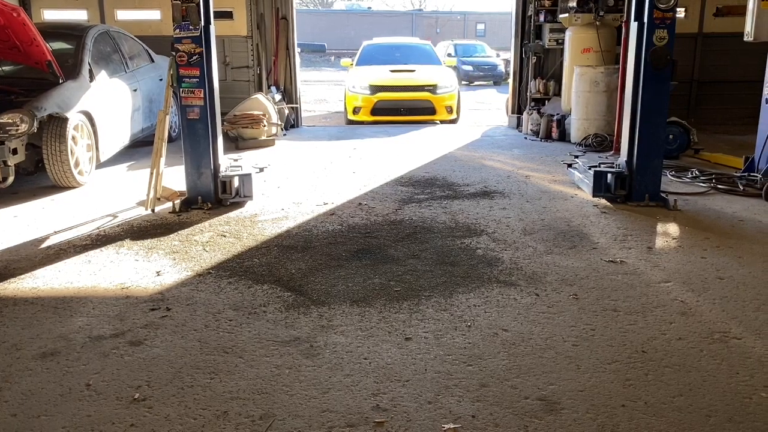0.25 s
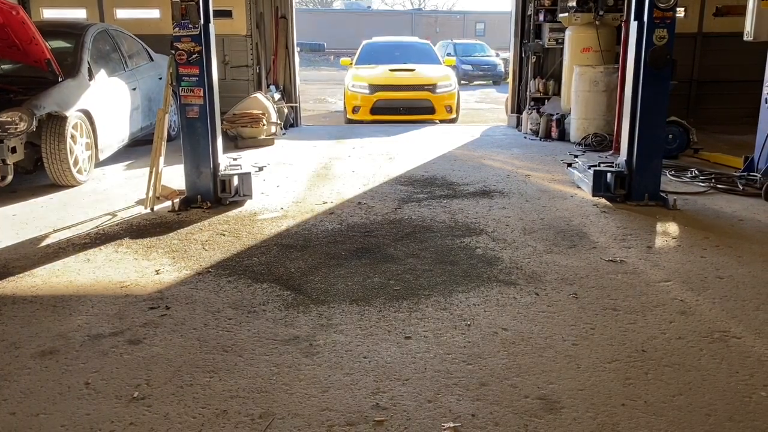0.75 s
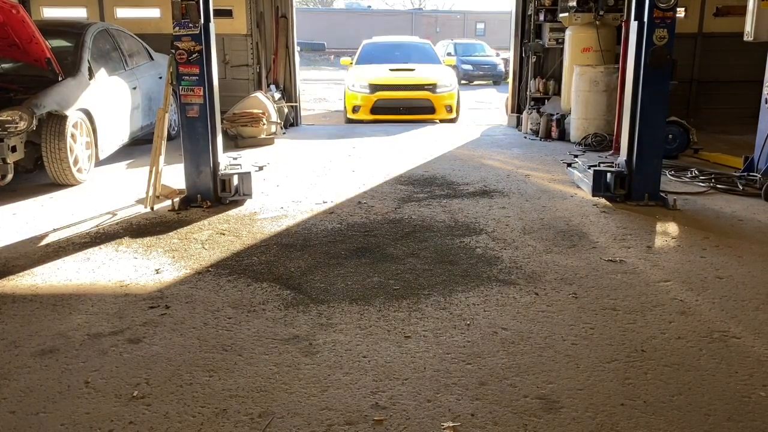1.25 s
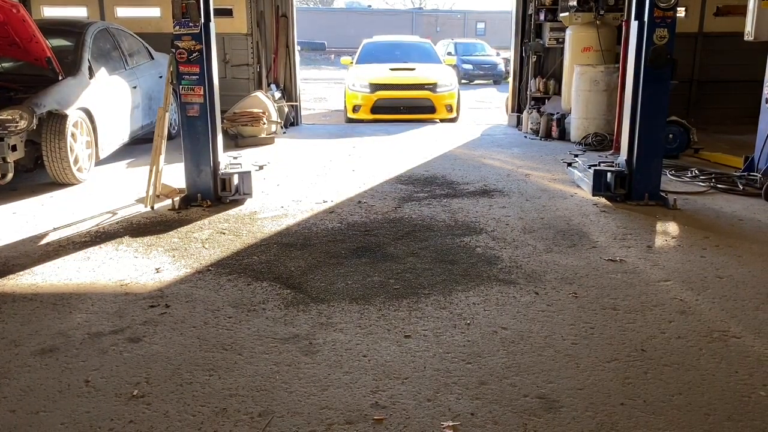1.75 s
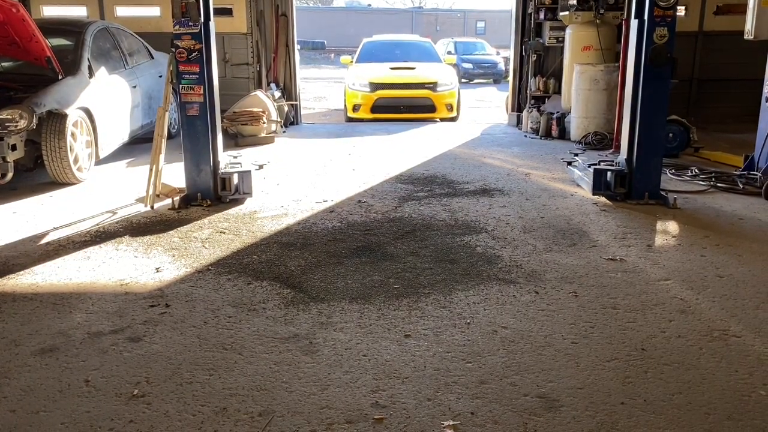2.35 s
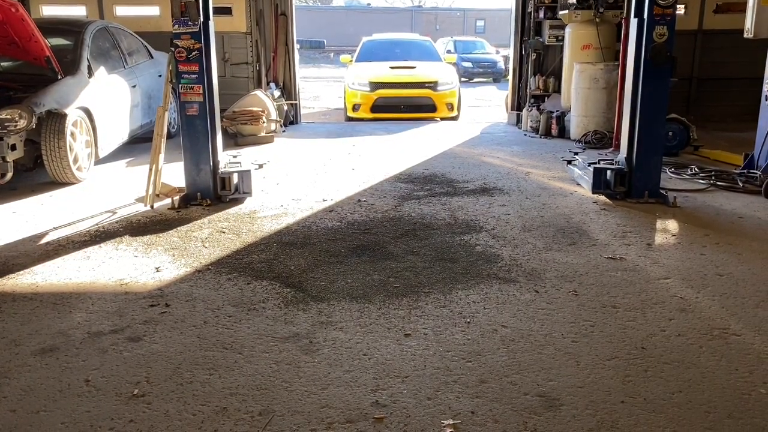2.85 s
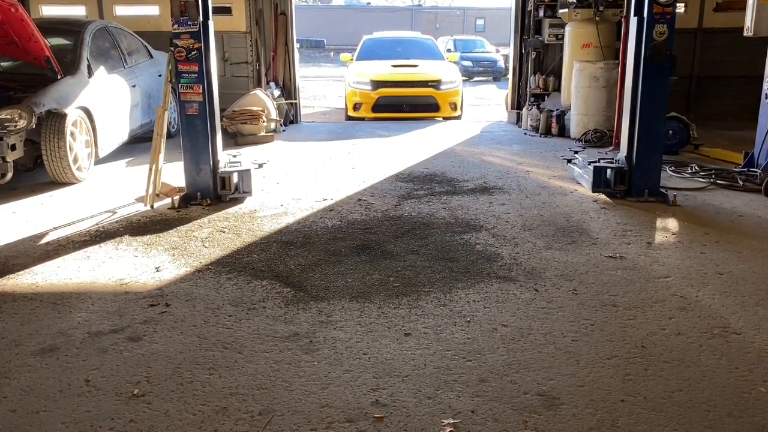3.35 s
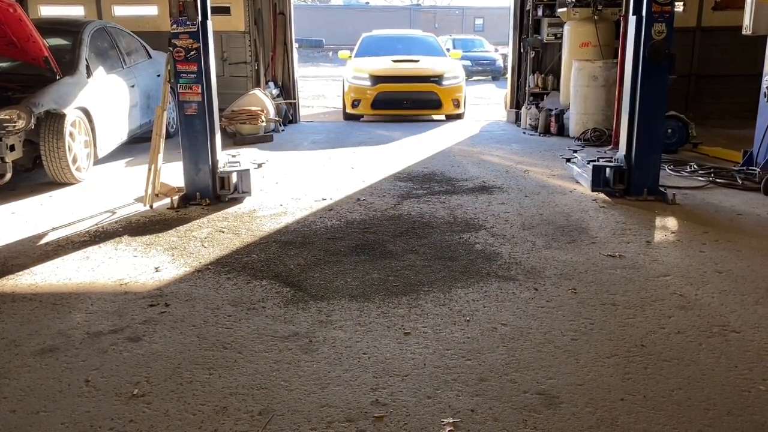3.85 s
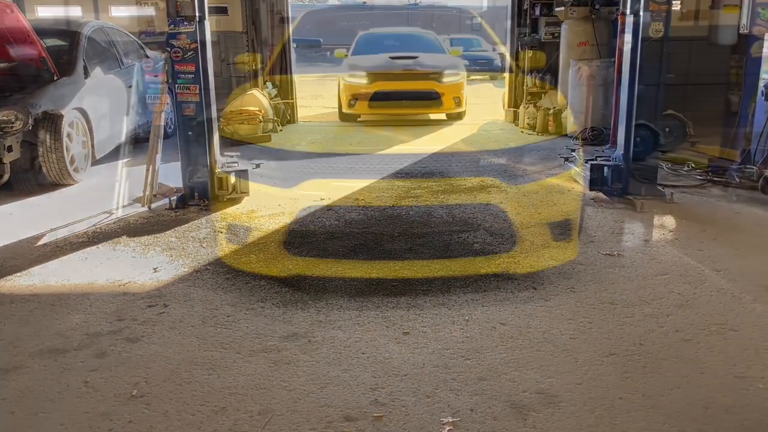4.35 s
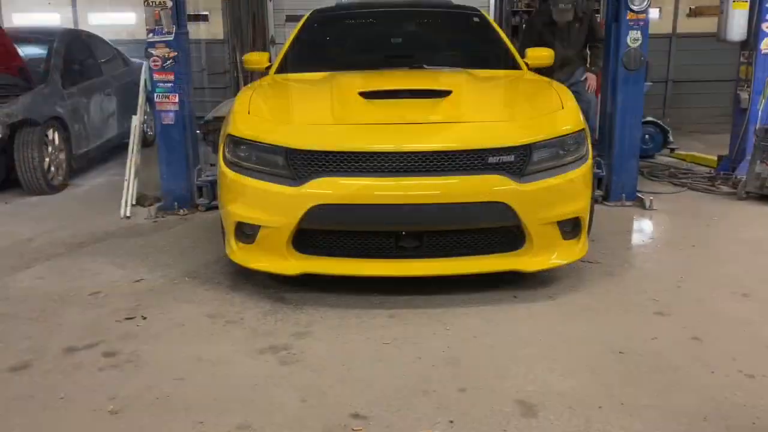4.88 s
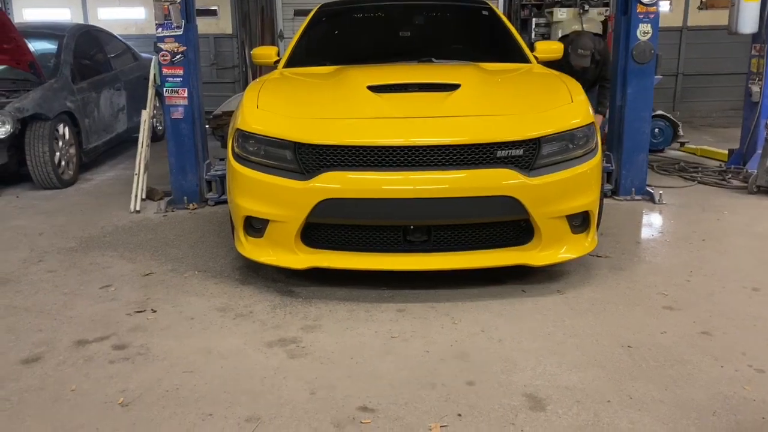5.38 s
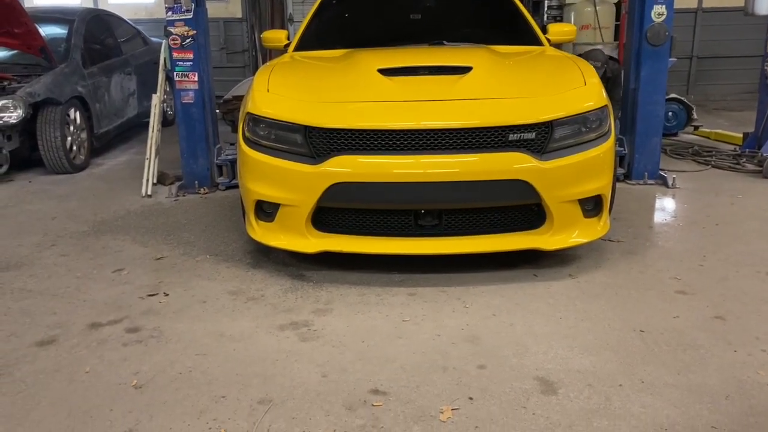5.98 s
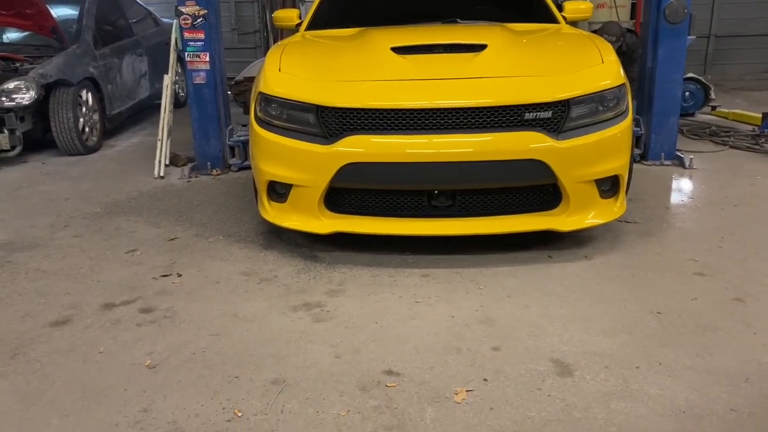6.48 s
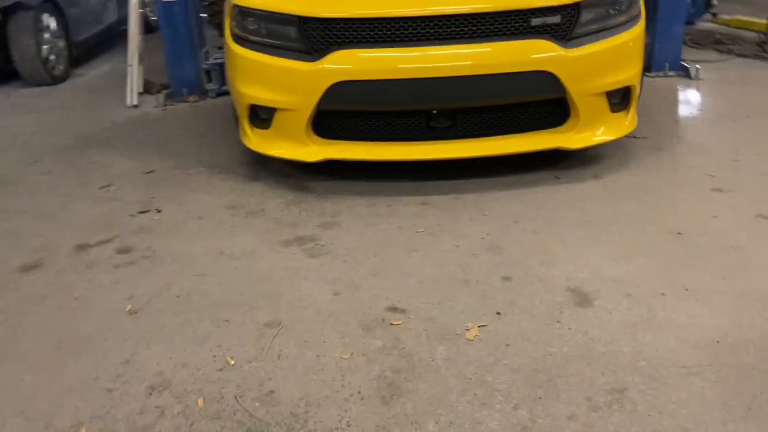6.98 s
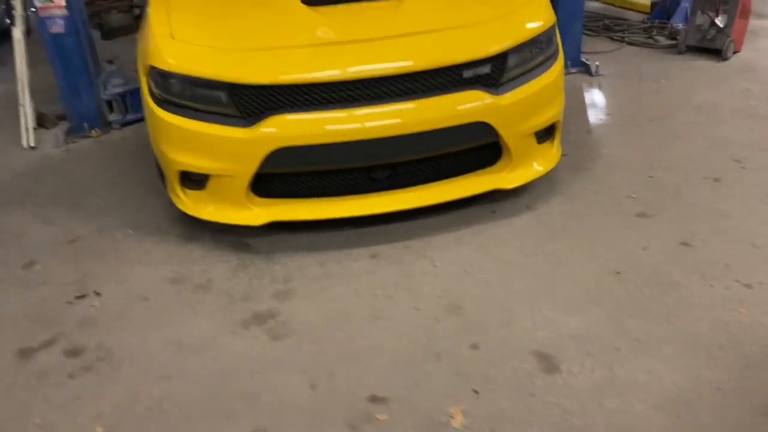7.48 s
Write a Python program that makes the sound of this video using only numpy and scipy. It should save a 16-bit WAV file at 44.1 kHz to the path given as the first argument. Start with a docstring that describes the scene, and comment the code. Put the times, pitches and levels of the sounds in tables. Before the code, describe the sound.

In a hard-walled workshop, a forced-air heater roars steadily with fluttering low booms, airy hiss and motor buzz. A V8 idles faintly low at the door. The sound cuts to complete silence for under a second, returns abruptly, and the engine blips. Then the engine fades out while a soft belt-and-fan whirr comes close. Near the end metal scrapes harshly, then a shoe drags and scuffs concrete. Wide stereo microphones shift position late.

```python
"""A workshop filled by the roar of a forced-air heater: random flame puffs ring the modes of its tube and the hall,
filtered noise makes the rush and hiss, and shaft harmonics make the motor buzz. From the start a V8 idles at the
door, heard as a firing tone and its octave; the sound drops out from about 1.1 to 2.0 s, and near 3 s the engine blips.
From 4 to 5 s the steady levels cross over: the engine tone fades away and a whirr of belts and fan stands close by.
After 6.9 s metal scrapes, then a shoe drags and scuffs: noisy rubbing, single resonant slips and dry ticks."""
import sys
import numpy as np
from scipy import signal
from scipy.fft import rfft, irfft, next_fast_len
from scipy.io import wavfile
from scipy.ndimage import uniform_filter1d

SR = 44100
rng = np.random.default_rng(int(sys.argv[2]) if len(sys.argv) > 2 else 0)


def dump_mix(stems):
    """Bounce the given channels to the path in sys.argv[1] as a 16-bit WAV at rate SR."""
    frames = np.atleast_2d(stems).T  # one column per channel
    limited = np.clip(frames, -1, 1)  # hard clip at full scale
    pcm = np.round(limited * 32767).astype(np.int16)
    wavfile.write(sys.argv[1], SR, pcm)


N = 340893
T = np.arange(N) / SR
SIZE = next_fast_len(N + SR)  # transform length, with room for ringing
HZ = np.fft.rfftfreq(SIZE, 1 / SR)


def gain_of(db):
    """Level law: decibels to an amplitude factor."""
    return 10 ** (np.asarray(db) / 20)


def balance(lean_db):
    """Stereo balance: left and right gains whose levels differ by lean_db."""
    return gain_of(np.array([[lean_db], [-lean_db]]) / 2)


def evened(x):
    """Normalization to unit rms."""
    return x / np.sqrt(np.mean(x ** 2) + 1e-20)


def ramp(start_s, end_s):
    """Linear transition from 0 to 1 between two times."""
    return np.clip((T - start_s) / (end_s - start_s), 0, 1)


def curve(rows, column=1):
    """Linear interpolation: one column of a time table at every sample."""
    rows = np.array(rows)
    return np.interp(T, rows[:, 0], rows[:, column])


def crossfaded(levels_db):
    """Power addition: gain of a steady source as its earlier level gives way to its later one."""
    later = ramp(3.98, 4.98)
    power = 1.12  # 1 = straight ramps, whose unrelated sounds sag in the middle
    before, after = gain_of(levels_db)
    return np.hypot(before * (1 - later) ** power, after * later ** power)


def flicker(rate_hz):
    """Low-passed noise: a slow random wobble of unit rms."""
    return evened(signal.lfilter(*signal.butter(2, rate_hz, fs=SR), rng.standard_normal(N)))


def puffs(per_s, spread_db):
    """Random impulse process: two unrelated trains of puffs, a few of them large."""
    size = gain_of(spread_db * np.minimum(rng.exponential(1, (2, N)), 4))
    occurs = rng.random((2, N)) < per_s / SR
    return size * occurs * rng.choice([-1., 1.], (2, N))


def peak(hz, width):
    """Resonance: squared Lorentzian power shape, its full width taken at a quarter of the peak power."""
    return 1 / (1 + (2 * (HZ - hz) / width) ** 2) ** 2


def modes(table):
    """Modal superposition of power: left and right magnitude, each mode with its own balance."""
    power = 0
    for hz, width, db, lean_db in table:
        # doubled decibels give power; half the lean goes to each side
        power = power + gain_of(2 * db) * balance(2 * lean_db) * peak(hz, width)
    return np.sqrt(power)


def ringing(body):
    """Modal superposition of power: magnitude of the resonances of one body."""
    return np.sqrt(sum(gain_of(2 * db) * peak(hz, width) for hz, width, db in body))


def causal(magnitude):
    """Minimum phase by cepstral folding: a ring follows its blow, with the same phase on both sides."""
    folded = irfft(np.log(np.atleast_2d(magnitude).mean(0) + 1e-9), SIZE)
    folded[1:SIZE // 2] *= 2
    folded[SIZE // 2 + 1:] = 0
    return magnitude * np.exp(1j * rfft(folded).imag)


def pair(drive, magnitude, lead_share=1):
    """Partial coherence: a coloured drive reaches left and right as a phase-shifted shared part and an unrelated one."""
    # phase by which the left side leads the right: frequency_hz, lead_rad
    lead_table = [(0, 0), (330, .9), (500, 1), (900, 2.3), (2000, 5.2), (3400, 9.1), (3700, 11),
                  (6200, 18.8), (6600, 19), (8300, 15.8), (8800, 15.5), (9700, 12.6), (10400, 12.5),
                  (11700, 9.45), (12400, 9.4), (13600, 6.4), (14400, 6.1), (15200, 4.1), (15800, 3.1)]
    # likeness of left and right sound by frequency: frequency_hz, likeness (0-1)
    likeness_table = [(100, 1), (150, .88), (250, .93), (380, .5), (440, .8), (550, .4), (700, .65),
                      (1100, .76), (2500, .7), (3500, .45), (6500, .3), (7900, .38), (8400, .85),
                      (9300, .62), (9800, 1), (10300, 1), (11400, .65), (11750, 1), (12350, 1),
                      (12700, .65), (13700, 1), (14300, 1), (15000, .8), (15700, .98)]
    first, other = rfft(drive, SIZE)
    alike = np.clip(np.interp(HZ, *np.transpose(likeness_table)), 0, 1)
    lead = lead_share * np.interp(HZ, *np.transpose(lead_table))
    shared = first * np.exp(-1j * lead)
    both = np.array([first, alike * shared + np.sqrt(1 - alike ** 2) * other])
    return evened(irfft(both * magnitude, SIZE)[:, :N])


def rub(stroke, body, per_s, lead_share):
    """Source and filter: dense random impulses under a gain, coloured by the resonances of a body."""
    return pair(puffs(per_s, spread_db=1.5), ringing(body), lead_share) * stroke


def strokes(rows, sag_db=6):
    """Amplitude envelope of friction: each stroke rises, sags while held, and falls."""
    range_db = 18  # depth of rise and fall
    out = np.zeros(N)
    for start, rise, hold, fall, db in rows:
        at = np.cumsum([start, rise, hold, fall])
        shape_db = np.interp(T, at, [-range_db, 0, -sag_db, -range_db])
        out += gain_of(db + shape_db) * (T > at[0]) * (T < at[-1])
    return uniform_filter1d(out, size=200)


def slips(rows):
    """Stick-slip excitation: each slip is a knock, a quick puff of grit and a tail carried on by the hall."""
    rise_s, t60_s, crest_db = .0015, .016, 1
    click, grit_share = 3.5, .75  # amplitude factors
    tail_db, tail_t60_s = -13, .16
    grit_power, knocks = np.zeros(N), np.zeros(N)
    for s, db, *_ in rows:
        since = np.maximum(T - s, 0)
        fade = grit_share ** 2 * gain_of(-120 * since / t60_s)  # 120 because this is power
        fade += gain_of(2 * tail_db - 120 * since / tail_t60_s)
        grit_power += gain_of(2 * (db - crest_db)) * fade * np.minimum(since / rise_s, 1)
        knocks[round((s + rise_s / 2) * SR)] = click * gain_of(db - crest_db)
    return rng.standard_normal((2, N)) * np.sqrt(grit_power) + knocks


def chatter(rows, body, lead_share, low_hz):
    """Impulsive modal excitation: single slips leave a body ringing, each favouring other modes."""
    treble_hz = 2700
    drive = slips(rows)
    rung = pair(drive, causal(ringing(body)), lead_share) * np.sqrt(np.mean(drive ** 2))
    treble_filter = signal.firwin(255, treble_hz, pass_zero=False, fs=SR)
    low_filter = signal.firwin(255, low_hz, fs=SR)
    treble = signal.oaconvolve(rung, treble_filter[None], "same")
    low = signal.oaconvolve(rung, low_filter[None], "same")
    treble_change = gain_of(curve(rows, column=2)) - 1
    low_change = gain_of(curve(rows, column=3)) - 1
    return rung + treble * treble_change + low * low_change


def boom_swells_db(column):
    """Gaussian level changes: brief random rises and dips in the level of the boom."""
    # rises and dips of the boom: time_s, tube_modes_db, deep_hall_modes_db (both over steady)
    swells = [(.03, 4, 2), (.22, 0, -0.5), (.38, 0, 4), (.89, -0.5, 3.5), (2.4, 0, 4.5), (2.641, 0.5, 4),
              (3.2, -1, 7), (3.6, 1, 9), (3.801, 2, 0), (4.06, 3, 3), (4.681, 3.5, 1.5), (4.98, -2, 4.5),
              (5.331, 1, 8), (6.07, 2, 1), (6.21, -3, 5), (6.7, 0.5, 2.5), (6.781, 1, 3.5), (7.02, 2, 4),
              (7.27, 1, 3), (7.57, 1.5, -2.5)]
    half_width_s = .035
    return sum(row[column] * np.exp(-.5 * ((T - row[0]) / half_width_s) ** 2) for row in swells)


def flame_boom():
    """Modal resonance: flame puffs ring the low modes of the heater tube and the hall."""
    # booming modes of tube and hall: frequency_hz, width_hz, level_db, left_minus_right_db
    boom_modes = [(64, 14, -7, 2), (73.1, 11, 2.5, -0.5), (91, 10, -7.5, 0.5), (102.6, 23.3, 3.5, 0),
                  (125.9, 14, -1.5, 3), (146.4, 15.2, -6.5, 6.5), (170.6, 17.3, -1.5, 3.5),
                  (183, 9.2, -2, -0.5), (205.2, 11.2, -8, 1.5), (222.3, 22.3, -5, 1.5), (234.2, 20, -6, 6),
                  (256.3, 14.7, -2, 3), (278.7, 18, -1, 1.5), (305.1, 24.6, -1, 1), (333.7, 12.6, -5.5, -5),
                  (359.4, 15, -4, 9.5)]
    # tube modes met once the microphones have swung aside: frequency_hz, width_hz, level_db, left_minus_right_db
    aside_modes = [(143, 27, -2, 1), (172, 30, -2, 4), (195, 29, -1.5, 1), (223, 27, -6, 2.5),
                   (241, 14, -3.5, 0), (283.3, 26, -1, 2), (317, 18, -7.5, 2), (345, 25, -7.5, -1),
                   (383, 24, -7, 3), (414, 20, -12, 3.5)]
    # hardest single puffs: boom_peak_s, size_db (over the weakest puff)
    pops = [(0.0257, 15), (0.2087, 19.5), (0.2715, 16), (0.3838, 16), (0.4843, 20), (0.6443, 18),
            (0.6963, 15.5), (0.758, 15), (0.8296, 14), (0.9267, 14), (0.9805, 17.5), (1.0972, 15.5),
            (2.0241, 16), (2.1384, 17.5), (2.191, 18.5), (2.3556, 18.5), (2.5341, 13), (2.6563, 18.5),
            (2.7228, 19), (2.8354, 11), (3.0298, 12), (3.071, 12), (3.1522, 16), (3.2387, 13),
            (3.334, 11.5), (3.373, 18), (3.6485, 14), (3.991, 19.5), (4.088, 17.5), (4.1722, 17),
            (4.2345, 22.5), (4.6563, 18), (5.2456, 11), (5.3383, 12.5), (5.384, 18), (5.592, 14.5),
            (5.7511, 14.5), (5.8089, 11.5), (5.873, 15), (6.071, 15.5), (6.1265, 9), (6.209, 21),
            (6.3336, 18), (6.6991, 20), (6.9578, 15.5), (7.0231, 18.5), (7.3671, 11.5), (7.4677, 14)]
    pop_swell_s = 0.0042  # a puff starts this long before its boom peaks
    drive = puffs(per_s=1000, spread_db=.6)
    pop_s, pop_db = np.transpose(pops)
    pop_at = np.round((pop_s - pop_swell_s) * SR).astype(int)
    popped = drive.copy()
    popped[:, pop_at] += gain_of(pop_db) * rng.choice([-1., 1.], (2, len(pops)))

    turned = ramp(6.8, 6.8 + 0.29)  # the microphones swing aside
    deep_modes = [mode for mode in boom_modes if mode[0] < 135]
    tube_modes = boom_modes[len(deep_modes):]
    deep_db = boom_swells_db(column=2) + 1.0 * flicker(rate_hz=3.2)
    deep_db -= 2 * turned  # the deep modes are weaker there
    tube_db = boom_swells_db(column=1) + 0.2 * flicker(rate_hz=9.7)
    tube = (1 - turned) * pair(popped, causal(modes(tube_modes)))
    tube += turned * gain_of(-0.98) * pair(popped, causal(modes(aside_modes)))
    deep = pair(drive, causal(modes(deep_modes)))
    return deep * crossfaded((-24.5, -22.5)) * gain_of(deep_db) + tube * crossfaded((-18, -18)) * gain_of(tube_db)


def heater_air():
    """Turbulence noise: air rushes through higher modes and hisses, both flickering together."""
    # higher modes that colour the rush: frequency_hz, width_hz, level_db, left_minus_right_db
    rush_modes = [(389, 11, -4, 0.5), (404.5, 17, -4.5, 8), (413, 19, -1, 4.5), (432.7, 59, -1, -8),
                  (460, 18, -7.5, 9), (487, 18, -7.5, 6.5), (511, 24, -8.5, 7), (536, 30, -8.5, 9.5),
                  (584, 64, -6, 4), (670, 114, -6, 3), (781, 98, -11, 8), (867, 52, -4, 2.5),
                  (970, 150, -15, 12), (1042.5, 30, -4.5, 6.5), (1136, 14, -5.5, 0.5), (1215, 22, -7, -1),
                  (1297, 16, -9.5, 3), (1135, 480, -13, -7)]
    # broad spectrum of the hiss: frequency_hz, level_db
    hiss_spectrum = [(1100, 4), (1400, -2), (1800, -8), (2300, -8), (2700, -11), (3300, -12), (4000, -15),
                     (5000, -18), (7000, -21), (9500, -22), (12000, -24), (13200, -22), (14000, -18),
                     (15600, -21)]
    # resonances and dips of the fan housing: frequency_hz, width_hz, change_db
    housing = [(1340, 110, -1), (1637, 110, 3.5), (1930, 76, -3.5), (2120, 210, 2.5), (2200, 54, -4.5),
               (2323, 27, -1.5), (2500, 45, -5), (2680, 80, -2), (2850, 70, 7), (2860, 60, -7.5),
               (3166, 480, 2.5), (3780, 200, 1), (4180, 234, 3.5)]
    wobble = flicker(rate_hz=27)
    rush = pair(puffs(per_s=3000, spread_db=2.5), modes(rush_modes))
    hz, db = np.transpose(hiss_spectrum)
    colour_db = np.interp(np.log(HZ + 1), np.log(hz), db)
    colour_db += sum(change_db * peak(at_hz, width) for at_hz, width, change_db in housing)
    above = 1 / np.sqrt(1 + (1250 / (HZ + 1)) ** 12)  # the rush takes over below 1250 Hz
    hiss = pair(rng.standard_normal((2, N)), gain_of(colour_db) * above)
    rush *= crossfaded((-28, -27.5)) * gain_of(1.0 * wobble)
    hiss *= crossfaded((-33, -33)) * gain_of(0.59 * wobble)
    return rush + hiss


def motor():
    """Harmonic series: whole multiples of the shaft rate, each wavering a little in level."""
    # motor buzz: shaft_multiple, early_db, later_db, moved_db (rms before balance and waver; moved = once the
    # microphones shift), left_minus_right_db, left_lead_rad, moved_left_lead_rad
    buzz = [(10, -48, -45, -45, 5, 0.2, 1.6), (24, -58, -52, -49, -9, -2.8, -2.8),
            (25, -51, -49, -51, -6, -2.8, -2.8), (27, -51, -54, -52, 1, -3.1, -4.7),
            (28, -44, -44, -48, 1, -2.2, -2.8), (29, -48, -48, -44, -5, -1.1, -2.8),
            (30, -60, -56, -63, 3, -1.5, -1.5), (31, -47, -49, -50, 0, -2.5, -3),
            (32, -57, -60, -54, -8, -1.3, -3.4), (33, -55, -49, -46, -9, -2.0, -2.5),
            (35, -47, -53, -46, -2, -1.0, -0.5), (37, -55, -54, -57, 1, -1.0, -0.5),
            (39, -52, -56, -54, 0, -0.5, -0.5), (40, -60, -66, -67, 4, -0.7, -0.7),
            (41, -67, -57, -63, -1, 0.2, 0.2), (42, -70, -62, -66, -1, 0.5, 0.5),
            (43, -52, -50, -57, -1, 0.3, 0.3), (45, -67, -59, -67, 0, 1.3, 1.3),
            (47, -60, -62, -61, -5, 1.8, 0.6), (49, -58, -61, -64, -1, 1.7, 1.7),
            (50, -54, -56, -61, -2, 1.8, 1.8), (51, -62, -61, -65, 0, 2.1, 2.1),
            (52, -55, -62, -63, 4, 1.8, 1.8), (54, -58, -61, -64, -1, 2.0, 2.0),
            (56, -61, -67, -60, 3, 2.7, 2.7), (57, -61, -61, -59, 2, 2.3, 2.3),
            (58, -60, -66, -68, -3, 2.3, 2.3), (59, -59, -60, -59, 1, -2.4, -3.1),
            (60, -61, -56, -57, 0, 2.3, 2.3), (62, -65, -59, -60, -3, -3.0, -3.0),
            (63, -67, -64, -60, -9, -3.1, -3.1), (64, -63, -57, -56, -3, -3.1, -3.1)]
    shaft_hz, waver_db = 57.27, 0.7
    silent_db = -200
    moved = ramp(6.2, 6.6)  # the microphones shift and meet the buzz at another spot
    early, later = 0, 0
    for k, early_db, later_db, moved_db, lean_db, lead, moved_lead in buzz:
        lag = np.array([[0], [1]]) * (lead + (moved_lead - lead) * moved)  # right behind left
        tone = np.sin(2 * np.pi * (k * shaft_hz * T + rng.random()) - lag)
        level_db = np.interp(T, np.linspace(0, T[-1], num=60), waver_db * rng.standard_normal(60))
        tone = tone * gain_of(level_db) * balance(lean_db)
        early = early + gain_of(early_db) * tone
        later = later + (gain_of(later_db) * (1 - moved) + gain_of(moved_db) * moved) * tone
    # root two turns rms into sine amplitude
    return np.sqrt(2) * (early * crossfaded((0, silent_db)) + later * crossfaded((silent_db, 0)))


def engine():
    """Periodic firing: only the far exhaust's firing tone and octave carry over the roar, with an uneven level."""
    # firing tone: time_s, pitch_hz, level_db (rms of the fundamental before its flutter)
    firing = [(0, 46.05, -32.5), (1.1, 46.7, -31), (2, 46.4, -39), (2.6, 46, -30), (2.84, 46.8, -29.5),
              (2.99, 61.1, -32), (3.25, 60, -25.5), (3.54, 66.07, -26), (3.79, 53.7, -31), (4.2, 50.9, -37),
              (4.6, 44.6, -35), (4.8, 44, -70), (7.73, 44, -70)]
    # the octave sounds where it meets a hall mode
    mode_hz, width_hz, on_db, off_db = 108, 13, 7.5, -9
    firing_hz = curve(firing)
    cycles = np.cumsum(firing_hz) / SR
    octave = gain_of(off_db) + gain_of(on_db) / (1 + (2 * (2 * firing_hz - mode_hz) / width_hz) ** 2)
    tone = np.sin(2 * np.pi * cycles) + octave * np.sin(4 * np.pi * cycles)
    return np.sqrt(2) * tone * gain_of(curve(firing, column=2) + 1.4 * flicker(rate_hz=5.3))


def metal_scrape():
    """Friction-driven resonance: a rubbing stroke and chattering slips ring a piece of metal."""
    # resonances of the metal: frequency_hz, width_hz, level_db
    metal = [(1280, 360, -4.5), (1630, 260, -1), (1870, 80, -3), (2290, 90, 2), (2430, 200, 6),
             (2850, 70, -12), (3000, 5200, -13.5), (3400, 130, -16), (3640, 90, -3), (3920, 110, -2),
             (4500, 140, -6), (5150, 240, -5), (6050, 130, -11), (6760, 110, -7)]
    # rubbing stroke: start_s, rise_s, hold_s, fall_s, level_db
    scrape_strokes = [(6.94, 0.055, 0.09, 0.15, -29)]
    # single slips: time_s, nominal_level_db, treble_over_middle_db, low_over_middle_db
    scrape_slips = [(6.9533, -19, -3, -6), (6.9686, -13, -7, -6), (6.9784, -14, -7, -7),
                    (6.9864, -13, -5, -3), (6.993, -9, -1, 2), (7.0014, -8, -2, -6), (7.0117, -8, -3, -6),
                    (7.0197, -9, -2, -3), (7.031, -17, -1, -3), (7.0376, -11, -4, -2),
                    (7.0485, -11, -3, -2), (7.0595, -15, -3, 1), (7.0675, -14, -3, 2),
                    (7.0734, -17, -2, -2), (7.086, -20, 0, -2), (7.0964, -20, 0, -2), (7.121, -22, 0, -2),
                    (7.136, -22, 0, -2)]
    rubbing = rub(strokes(scrape_strokes), metal, per_s=4100, lead_share=0.11)
    return rubbing + chatter(scrape_slips, metal, low_hz=2020, lead_share=0.25)


def shoe_drag():
    """Friction noise: a shoe drags low and dull on concrete, louder on the left."""
    # resonances of the floor: frequency_hz, width_hz, level_db
    floor = [(500, 90, -2), (565, 50, 3), (670, 70, 0), (745, 60, 1), (805, 30, 0), (873, 25, 1),
             (680, 450, -1)]
    # dragging strokes: start_s, rise_s, hold_s, fall_s, level_db (before balance)
    drag_strokes = [(7.215, 0.029, 0.078, 0.044, -29), (7.37, 0.064, 0.3, .03, -29.5)]
    return rub(strokes(drag_strokes, sag_db=3.0), floor, per_s=1500, lead_share=1.0) * balance(lean_db=8)


def shoe_scuff():
    """Friction-driven resonance: a rubbing stroke and single slips ring a shoe sole."""
    # resonances of the sole: frequency_hz, width_hz, level_db
    sole = [(1150, 150, -2), (1400, 360, 5.5), (1830, 300, 8.5), (2130, 300, -1), (2540, 140, -3),
            (2480, 2800, -11.5), (3290, 300, -5.5)]
    # rubbing stroke: start_s, rise_s, hold_s, fall_s, level_db
    scuff_strokes = [(7.418, 0.012, 0.085, 0.1, -23)]
    # single slips: time_s, nominal_level_db, treble_over_middle_db, low_over_middle_db
    scuff_slips = [(7.4235, -23, 9, 0), (7.4295, -13, 0, 0), (7.4345, -14, 3, 0), (7.441, -17, 0, -3),
                   (7.449, -18, 0, -3), (7.462, -21, 0, -3), (7.474, -24, 0, -4), (7.487, -22, 3, -4),
                   (7.495, -22, 3, -4), (7.515, -24, 0, -3), (7.5595, -23, -3, -5)]
    rubbing = rub(strokes(scuff_strokes), sole, per_s=3600, lead_share=0.71)
    return rubbing + chatter(scuff_slips, sole, low_hz=1600, lead_share=0.87)


def ticks():
    """Decaying band noise: short dry snaps where the rubbing catches, partly alike on both sides."""
    # snaps: time_s, peak_db, from_hz, to_hz, t60_s
    snaps = [(6.953, -21, 3700, 4300, .035), (7.4088, -15, 1000, 3700, .016), (7.231, -16, 520, 950, .03)]
    length = 400  # samples
    out, t = np.zeros((2, N)), np.arange(length) / SR
    for s, db, low_hz, high_hz, t60 in snaps:
        snap = rng.standard_normal((2, length)) * gain_of(-60 * t / t60)
        snap = snap + 0.17 * snap[::-1]  # each side leaks into the other
        snap = signal.lfilter(*signal.butter(4, [low_hz, high_hz], "band", fs=SR), snap)
        start = round(s * SR)
        out[:, start:start + length] += gain_of(db) * snap / abs(snap).max()
    return out


def whirr():
    """Broad resonances driven by noise: belts and fan of the car, louder once it stands close by."""
    # resonances of belts and fan: frequency_hz, width_hz, level_db
    belts_and_fan = [(2305, 200, 5.5), (2620, 230, 7), (2980, 870, -2), (4670, 1500, 6.5), (5710, 4900, 4)]
    return rub(crossfaded((-57, -46.5)), belts_and_fan, per_s=4800, lead_share=0.91)


def whistle():
    """Narrow-band noise: a fuzzy whistle of the fan housing that comes and goes."""
    # whistling resonances of the fan housing: frequency_hz, width_hz, level_db
    whistle_modes = [(2060, 40, 0), (2100, 45, 0)]
    level = crossfaded((-52, -52)) * gain_of(2 * flicker(rate_hz=5.06))
    return rub(level, whistle_modes, per_s=6000, lead_share=0.92)


def rumble():
    """Low resonances driven by sparse impulses: a rumble swells near the end."""
    swell = strokes([(6.7, .3, 0.9, .1, -26)])  # start_s, rise_s, hold_s, fall_s, level_db
    low_modes = [(52.3, 11, -6), (70, 25, 0)]  # frequency_hz, width_hz, level_db
    return rub(swell, low_modes, per_s=200, lead_share=0.84)


def scene():
    """Linear superposition of all sources."""
    heater = flame_boom() + heater_air() + motor() + whistle()
    car = engine() + whirr()
    handling = metal_scrape() + shoe_drag() + shoe_scuff() + ticks()
    return heater + car + handling + rumble()


def record(dry):
    """Soft saturation rounds the highest peaks; the sound cuts out hard and fades back in; a low-pass limits the band."""
    off_s, on_s, fade_s = 1.1039, 1.9695, .005
    edge_hz = 15750
    rounded = 1.1 * np.tanh(dry / 1.1)
    gate = np.where(T < off_s, 1, ramp(on_s, on_s + fade_s))
    band_limit = signal.firwin(511, edge_hz, window=("kaiser", 9), fs=SR)
    return signal.oaconvolve(rounded * gate, band_limit[None], "same")


dry = scene()
out = record(dry)
dump_mix(out)
```